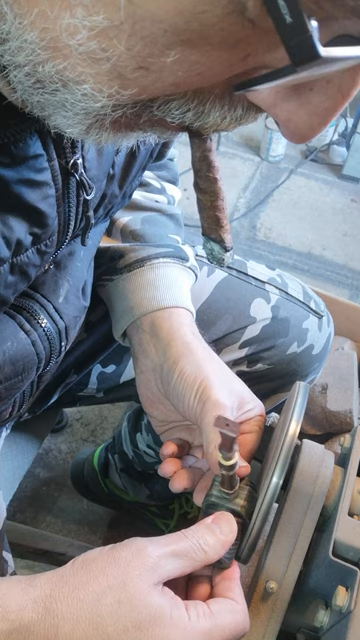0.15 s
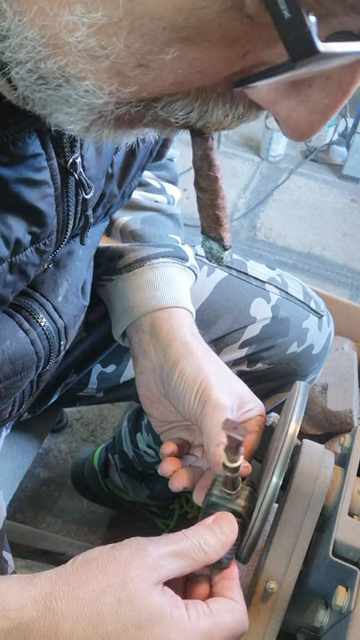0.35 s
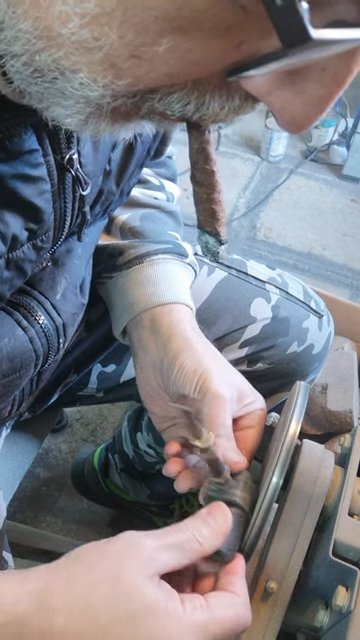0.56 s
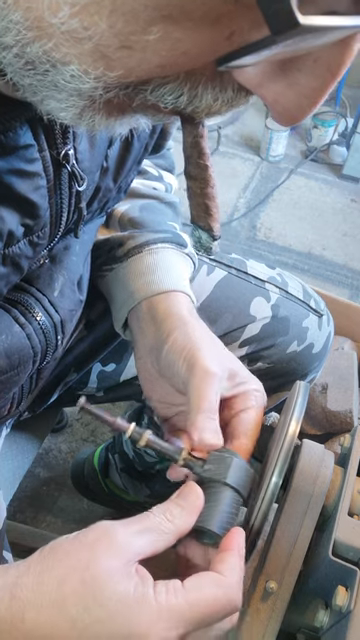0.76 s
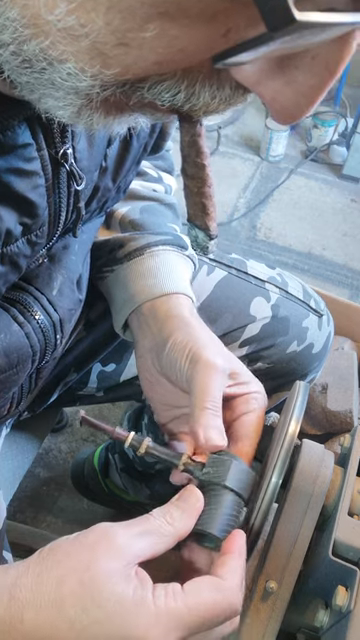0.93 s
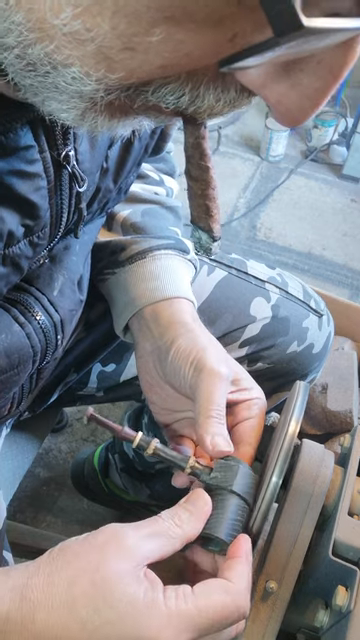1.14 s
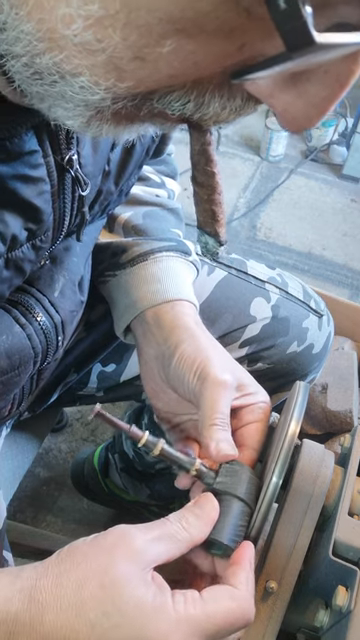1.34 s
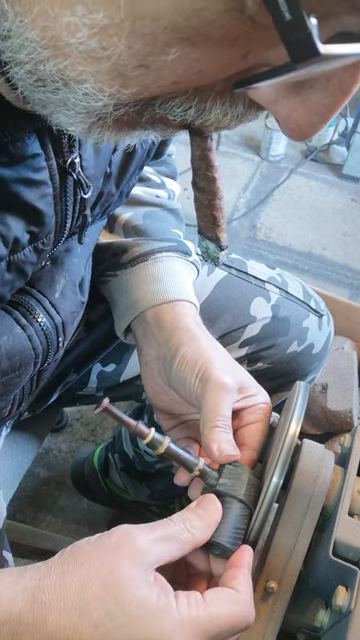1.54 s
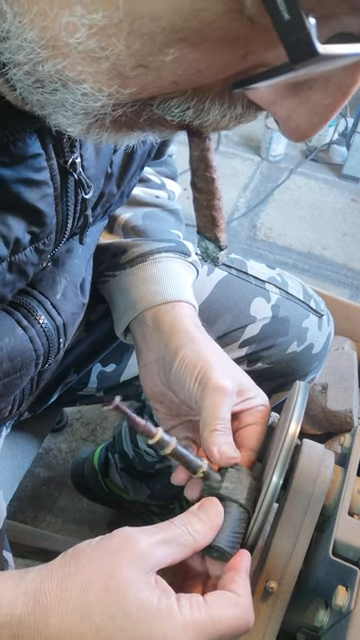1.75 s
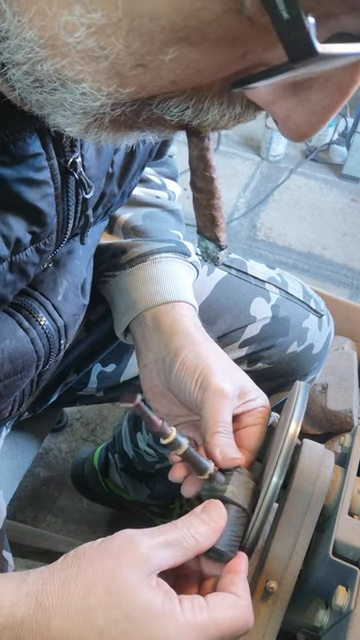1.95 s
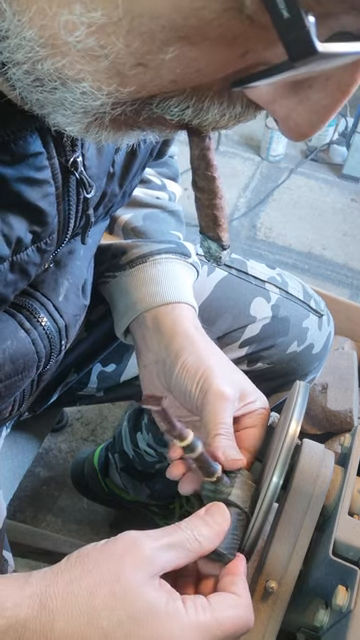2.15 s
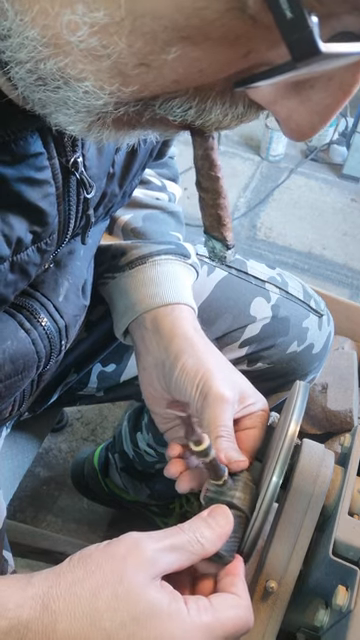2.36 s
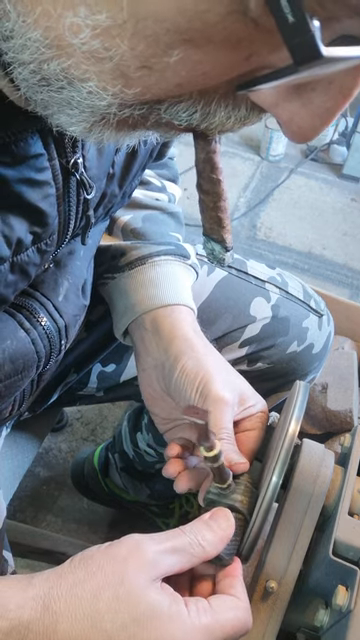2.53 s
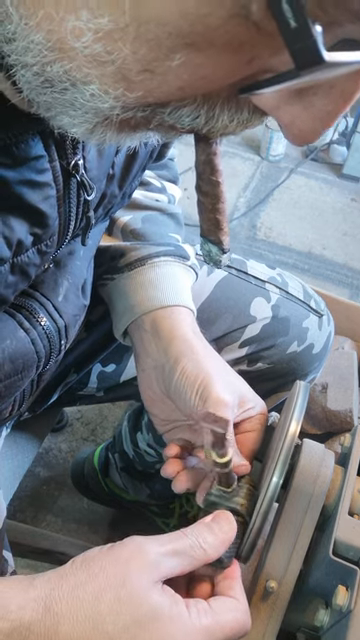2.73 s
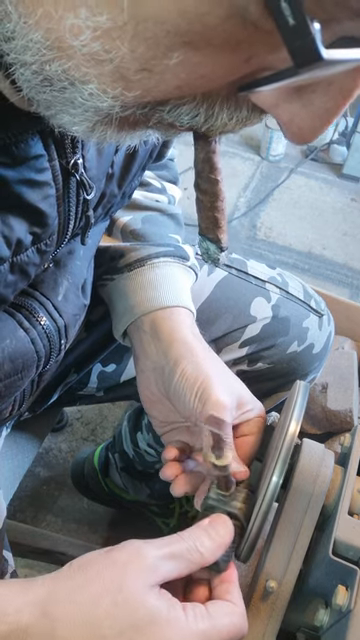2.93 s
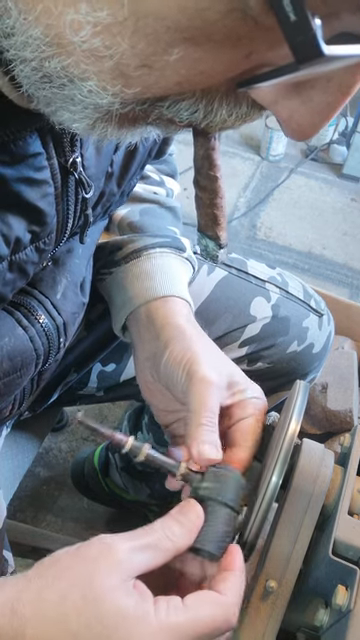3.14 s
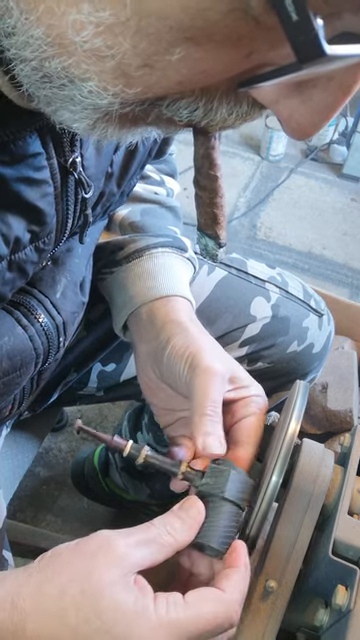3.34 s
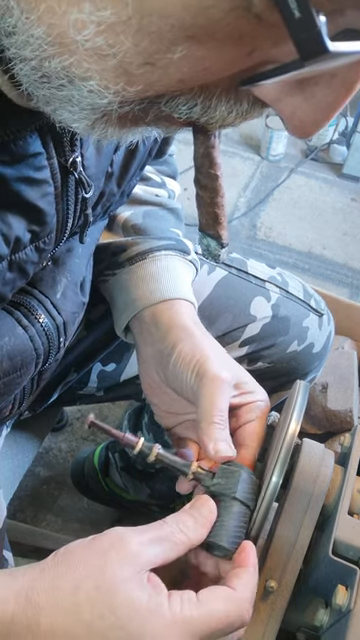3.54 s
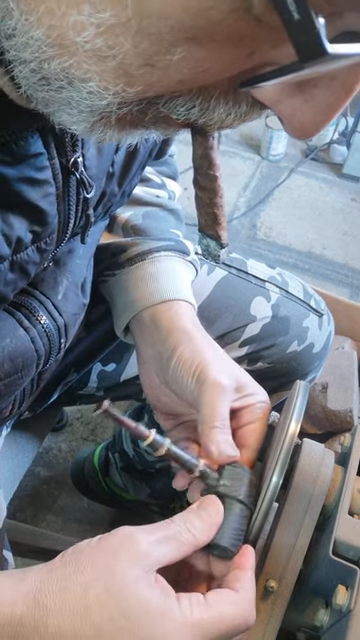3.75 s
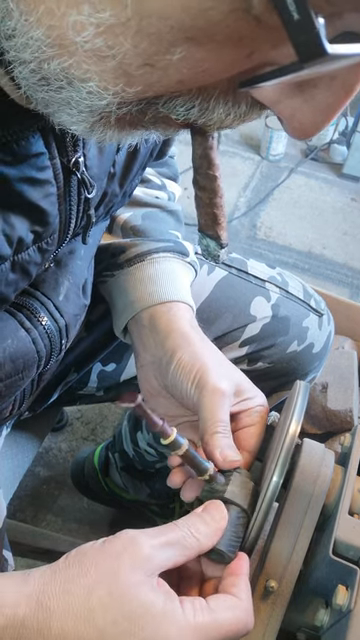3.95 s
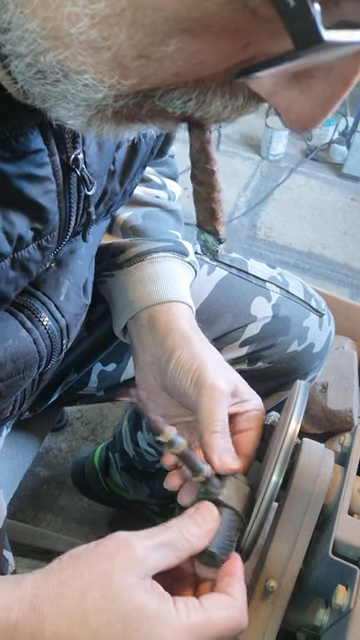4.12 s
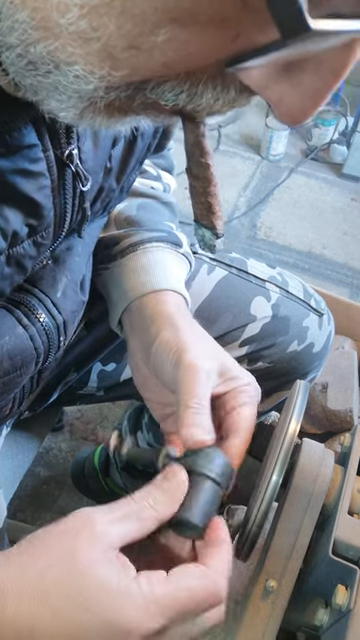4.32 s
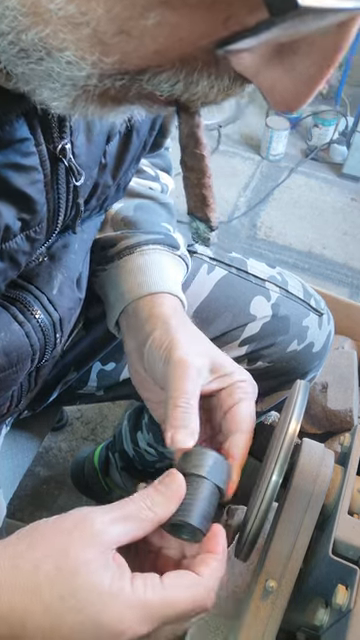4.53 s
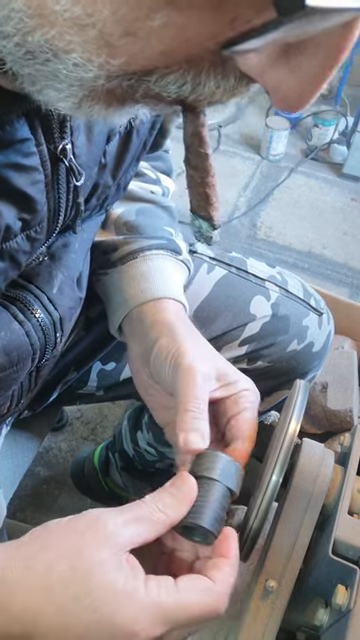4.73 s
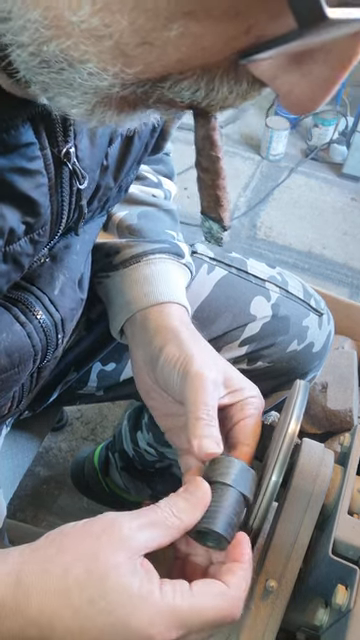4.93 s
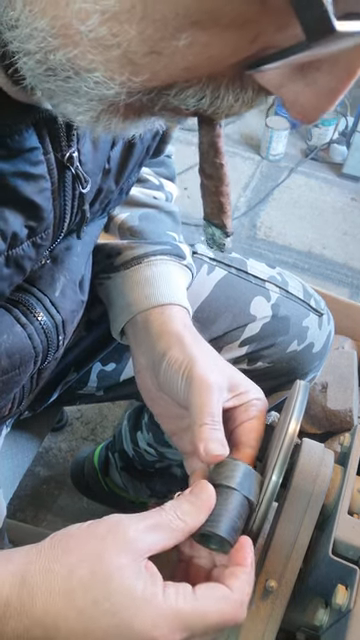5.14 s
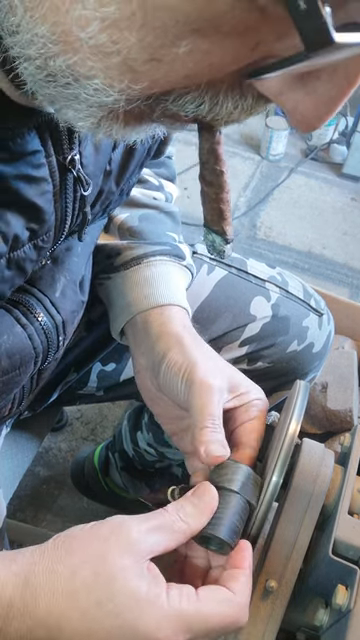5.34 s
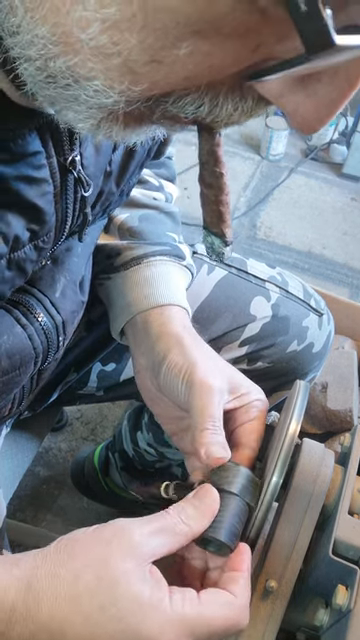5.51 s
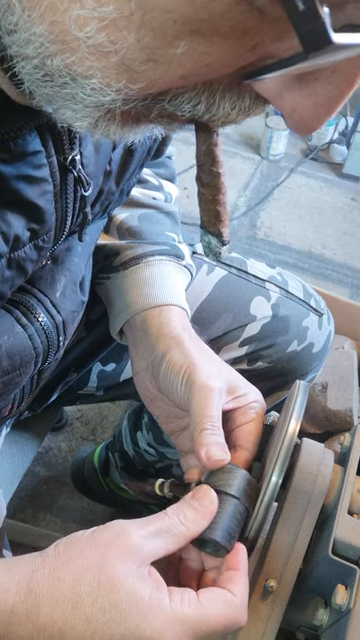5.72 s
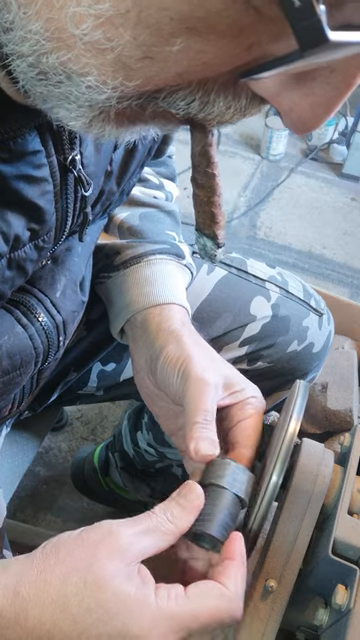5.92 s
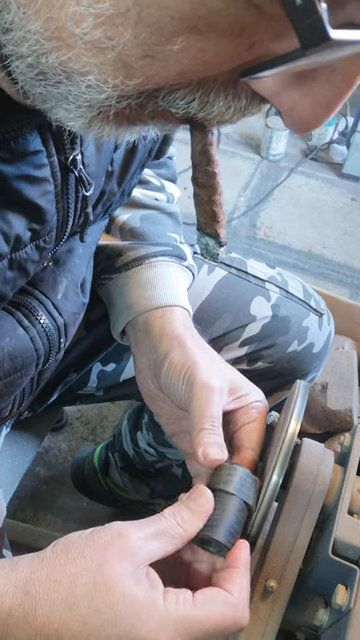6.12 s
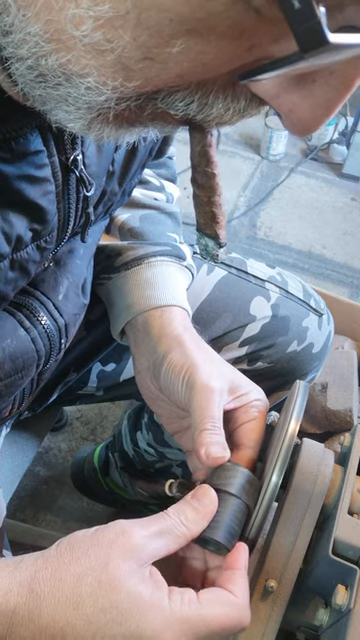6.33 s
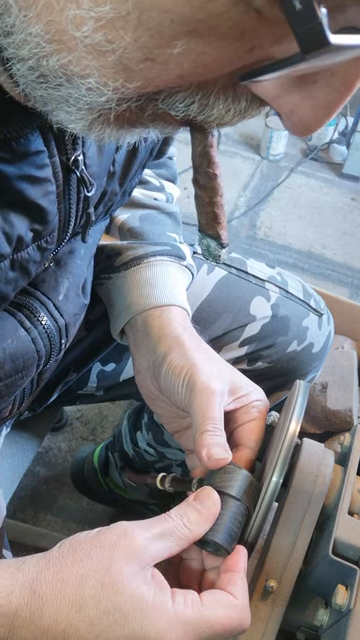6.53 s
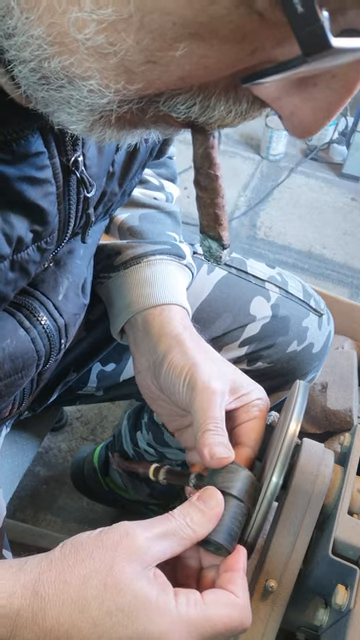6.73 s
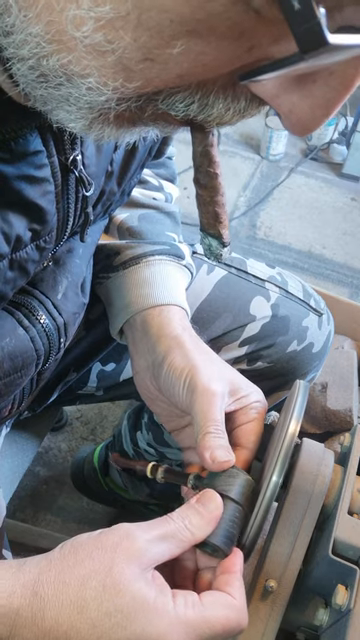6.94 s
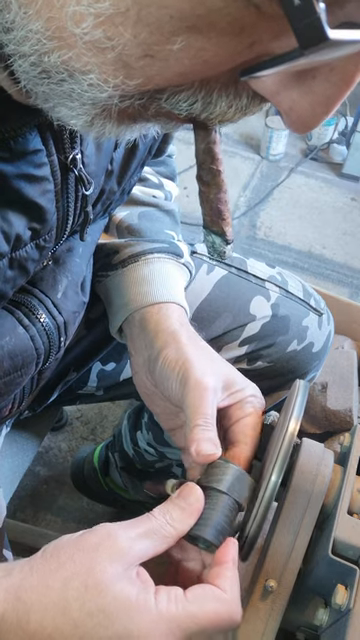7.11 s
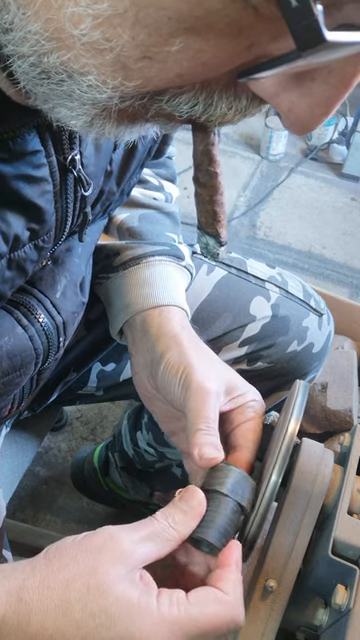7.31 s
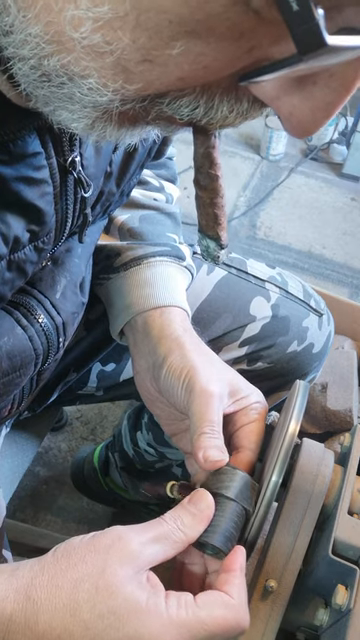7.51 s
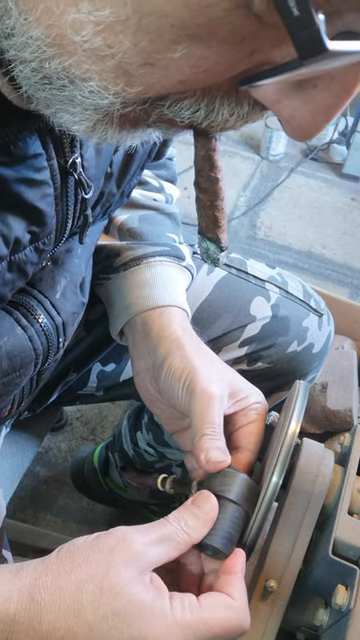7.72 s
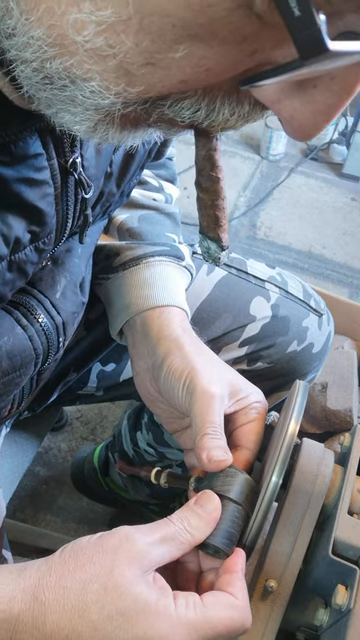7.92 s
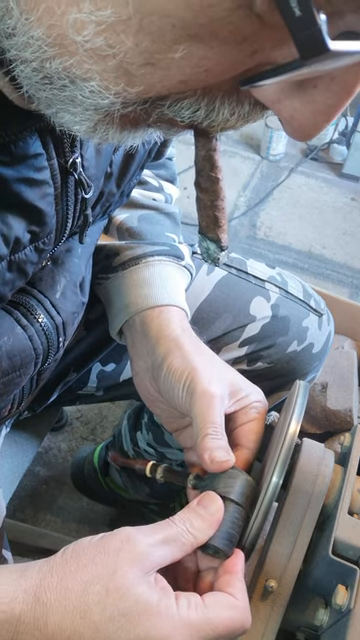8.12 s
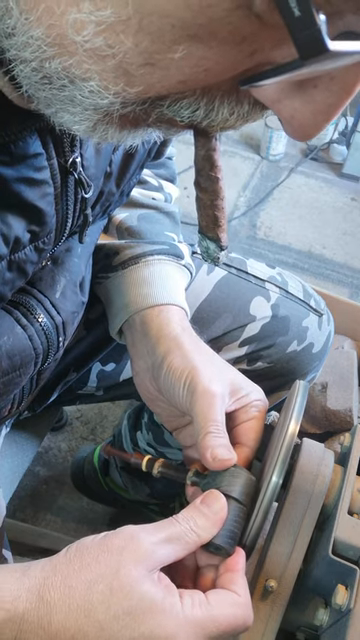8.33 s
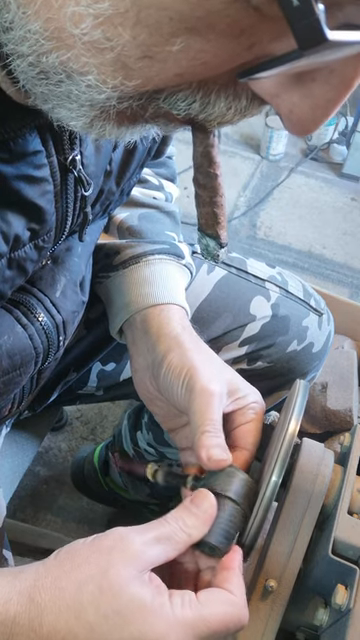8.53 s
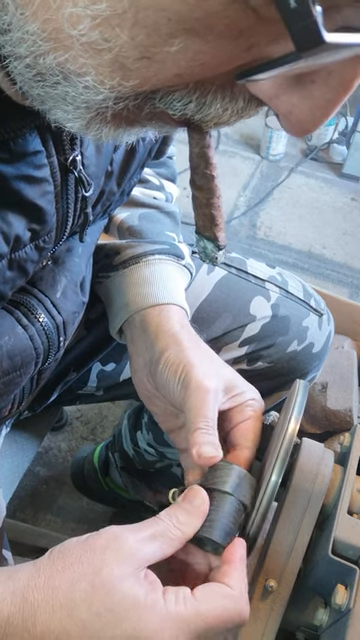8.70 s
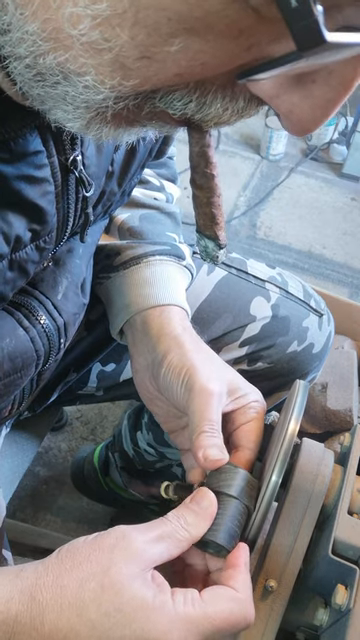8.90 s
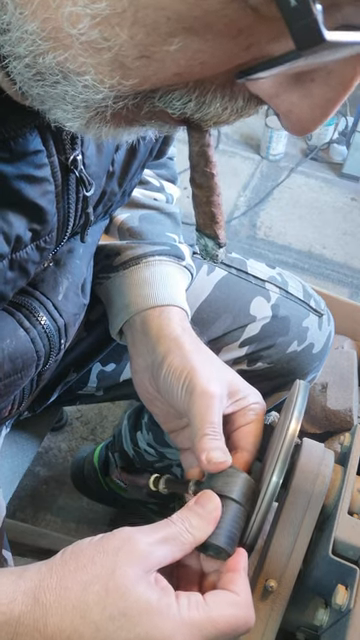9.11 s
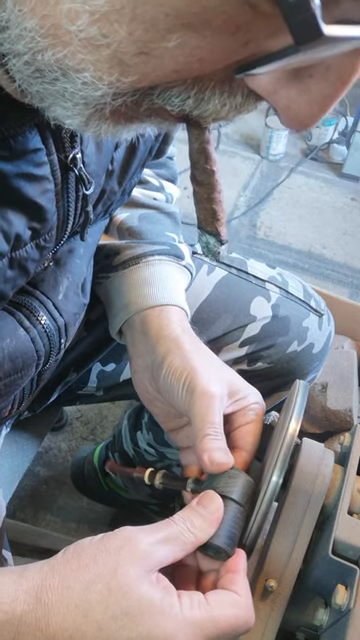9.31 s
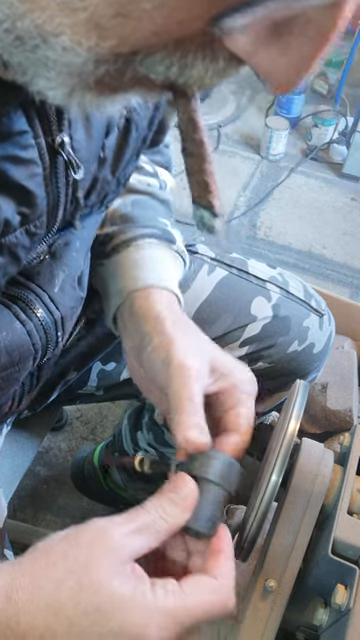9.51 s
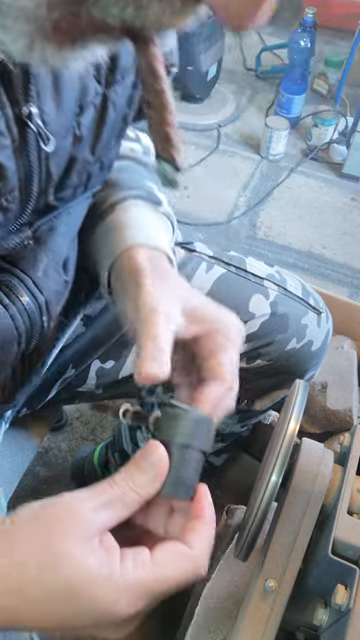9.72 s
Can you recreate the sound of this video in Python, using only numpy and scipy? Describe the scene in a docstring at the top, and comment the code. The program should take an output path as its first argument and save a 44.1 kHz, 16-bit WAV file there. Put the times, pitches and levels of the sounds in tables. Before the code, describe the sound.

An electric disc sander runs throughout, heard close up in stereo in a workshop with slight room reflections. Its motor gives a low hum, with a wavering fan whir and a soft hiss of air from the disc. A small piece of wood touches the disc seven times, each time making a bright, gritty rasp that throbs rapidly with the rotation. The first rasp is already under way and stops at about 0.7 seconds. The longest runs from 1.3 to 3.1 seconds, and a short one with a sharper start follows from 3.7 to 4.2. After a second of free running, four more come closer together: 5.2 to 5.9, 6.2 to 7.1, 7.5 to 8.6 and 8.9 to 9.5 seconds. Each touch slightly lowers the motor's pitch and softens its hum, which recovers as the wood lifts. The sander runs free briefly at the end.

```python
"""In a workshop, a disc sander runs on a bench and a small piece of wood touches it seven times.
Grit scrapes the wood with a bright rasp that throbs with each turn, and each touch slows the motor.
Underneath, the shaft and the mains hum, the fan whirs and air dragged by the disc hisses.
The sound is heard at two close microphone openings (ports), left and right."""
import sys
import numpy as np
from scipy import signal
from scipy.fft import rfft, irfft, next_fast_len
from scipy.io import wavfile

SR = 44100
rng = np.random.default_rng(int(sys.argv[2]) if len(sys.argv) > 2 else 0)


def bounce(signal):
    """Save signal as a 16-bit WAV file at the path given by the first command-line argument."""
    frames = np.transpose(np.atleast_2d(signal))
    limited = np.clip(frames, -1, 1)
    pcm = np.round(limited * 32767).astype(np.int16)
    wavfile.write(sys.argv[1], SR, pcm)


N = 430416
FFT_SIZE = next_fast_len(N)

# The wood's touches on the disc. Each row: landing time, time held and lifting time in seconds;
# rasp in dB at landing, once settled and at lift-off; first treble, last treble and wood body in dB
# against the rasp; hum in dB under load and once free; the free hum's change in dB per second.
TOUCHES = [(-.3, 1.045, 0.031, -33, -19.5, -20, -6.5, -6, -2, -37.5, -35, 8),
           (1.335, 1.73, 0.046, -23.5, -23, -19.5, -9, -4.5, -2.5, -40, -34, 2),
           (3.654, 0.53, 0.067, -18, -27, -19.5, -8.5, -9, -3, -39.5, -31, -6.5),
           (5.191, .66, 0.047, -28.5, -23, -18.5, -3, -4.5, -6, -42, -32, 1.5),
           (6.17, .925, 0.061, -29.5, -18, -18.5, -2.5, -7, -6.5, -40, -31, -13),
           (7.485, 1.112, 0.077, -26.5, -20.5, -17, -2.5, -7, -5.5, -42, -34, -5),
           (8.911, 0.56, .065, -22.5, -21.5, -18.5, -3, -5, -6.5, -41.5, -31.5, -13)]


def rasp(pressure, treble_gain, body_gain, turns):
    """Grains of grit tick the wood; the uneven disc repeats its pattern each turn and the hands tremble."""
    # The tone of the scrape. Each row: pitch in Hz, left and right strength in dB,
    # share common to both ports from 0 to 1, the right port's lead in radians.
    scrape_tone = [(2450, -30.5, -29.5, 0.95, -3), (3450, -20, -20.5, 0.08, -5),
                   (4260, -19.5, -15.5, 0.7, -4.5), (5580, -12.5, -18, 0, 1.5),
                   (6290, -12.5, -13.5, 0.31, -2.5), (7340, -6, -5, 0.5, -2), (7520, -2, -5, 1, -1.37),
                   (8060, -4.5, -11.5, 0.69, -0.9), (8840, -10, -4.5, 0, 1.3), (9740, -14, -2.5, 1, -2.5),
                   (10170, -16, -8, 0.1, 0.3), (11420, -22.5, -18.5, 0.26, 2),
                   (13000, -25.5, -22, 0.7, 0.5), (14900, -25, -20.5, 0.5, 2.5)]
    grain_sizes = gain_of(0.51 * np.minimum(rng.exponential(1, N), 4))
    grit = grain_sizes * rng.standard_normal(N) * (rng.random(N) < .6)
    wander = 0.75 * drift(1.8)
    lumps = sum(np.cos(2 * np.pi * (k * turns + rng.random() + wander)) / k ** 0.17 for k in range(1, 9))
    tremble = 0.57 * drift(40, low_hz=5)
    level = unit_level(gain_of(0.5 * lumps + tremble)) * pressure
    scrape = unit_level(grit) * level
    spectrum = ports(scrape_tone, scrape, workshop_echoes(scrape, level, echo_share=0.69))
    # Four bands, each with its own level. From low to high: body, core, sheen, treble.
    hz = np.fft.rfftfreq(FFT_SIZE, 1 / SR)
    low = 1 / (1 + (hz / 6400) ** 16)
    upper = 1 / (1 + (8300 / (hz + 1)) ** 30)
    top = 1 / (1 + (11000 / (hz + 1)) ** 20)
    bands = irfft(spectrum * np.array([low, 1 - low - upper, upper - top, top])[:, None], FFT_SIZE)[..., :N]
    body, core, sheen, treble = (unit_level(band) * np.sqrt(np.mean(pressure ** 2)) for band in bands)
    sheen_gain = gain_of(-2.7) * treble_gain ** 0.43  # partly follows the treble
    return body_gain * body + core + sheen_gain * sheen + treble_gain * treble


def touch(start_s, held_s, lift_s, first_db, settled_db, last_db, treble_from_db, treble_to_db, body_db):
    """Rasp, treble and body of one touch in dB: the grit bites, the hands settle, the wood lifts off."""
    bite_db, bite_s, settle_s = -6.5, 0.0069, .11
    t = np.arange(N) / SR - start_s
    age = np.maximum(t, 0)
    progress = np.clip(t / held_s, 0, 1)
    lifted = (np.maximum(t - held_s, 0) / lift_s) ** 1.336
    level = settled_db + (last_db - settled_db) * progress
    level += (first_db - settled_db) * np.exp(-age / settle_s)
    level += bite_db * np.exp(-age / bite_s) - 19 * lifted
    treble = treble_from_db + (treble_to_db - treble_from_db) * progress ** 1.3
    treble -= 7 * np.minimum(lifted, 1)  # the treble leaves first
    body_follows, firm_db = 0.63, -24  # the body takes this share of changes around a firm touch
    body = body_db - (1 - body_follows) * (np.maximum(level, -45) - firm_db)
    return np.where((t >= 0) & (lifted < 2), [level, treble, body], -200)


def contact():
    """All touches together: pressure, treble gain, body gain and the drag on the disc from 0 to 1."""
    levels_db = np.array([touch(*row[:9]) for row in TOUCHES]).max(0)
    treble_gain, body_gain = gain_of(np.maximum(levels_db[1:], -40))
    drag = np.clip((levels_db[0] + 36) / 14, 0, 1)
    return gain_of(levels_db[0]), treble_gain, body_gain, drag


def motor_hum(drag, load, turns):
    """The shaft shakes the bench at multiples of its speed; the load changes which tones stand out."""
    # The shaft's tones. Each row: multiple of the shaft speed, relative dB running free and under load.
    shaft_tones = [(2, -22, -12.5), (3, -7.5, -11), (4, -9, 0.5), (5, -8.5, -33), (6, -34, -27),
                   (7, -13.5, -12), (8, -20, -8), (10, -17, -58), (11, -28.5, -13.5)]
    mains_hz, stand_hz = 100, 43.5
    t = np.arange(N) / SR
    groan_hz = 75.7 + 11.5 * np.clip(load - drag, 0, 1)
    tones = [(k * turns, free_db, loaded_db) for k, free_db, loaded_db in shaft_tones]
    tones += [(mains_hz * t, -13.5, -5),  # magnetic pull, twice per mains cycle
              (np.cumsum(groan_hz) / SR, -1, -10),  # the bench groans: up at lift-off, then sliding down
              (stand_hz * t, -13, -6)]  # the stand hums low
    strain = np.minimum(drag, load)  # the bench answers a lift-off at once, a touch slowly
    hum = np.zeros(N)
    for cycles, free_db, loaded_db in tones:
        wavering_db = free_db + (loaded_db - free_db) * strain + 1.7 * drift(5.4)
        hum += gain_of(wavering_db) * np.sin(2 * np.pi * (cycles + rng.random()))
    return gain_of(hum_level(drag)) * hum * np.ones((2, 1))


def hum_level(drag):
    """The hum in dB: it sinks under each touch, returns when the disc runs free, then swells or fades."""
    opening_db, dip_db, regrow_s, hang_on_s = -34, -5.5, 0.21, 0.058
    start_s, held_s, *_, under_db, after_db, db_per_s = np.transpose(TOUCHES)
    t = np.arange(N) / SR
    latest = np.searchsorted(start_s + held_s / 2, t) - 1  # the last touch that is half over
    free_s = np.clip(t - start_s[latest] - held_s[latest], 0, 1)
    free_db = np.where(latest < 0, opening_db, after_db[latest] + db_per_s[latest] * free_s)
    landed = np.searchsorted(start_s, t) - 1
    loaded_db = under_db[landed] + dip_db * np.exp((start_s[landed] - t) / regrow_s)
    loaded_share = np.minimum(drag, np.clip(lag(drag, hang_on_s) * 2.9 - .9, 0, 1))
    return free_db + (loaded_db - free_db) * loaded_share


def fan_whir(turns):
    """The fan stirs the air into a whir that slowly rises and falls in level."""
    # The tone of the whir. Each row: pitch in Hz, left and right strength in dB,
    # share common to both ports from 0 to 1, the right port's lead in radians.
    whir_tone = [(30, -9, -10, 0.97, 2), (60, -5, -9, 0.76, 0.2), (133, -14, -12.5, 1, 1.07),
                 (330, -14.5, -15, 0.65, -0.87), (464, -19.5, -17, 0.15, 1), (571, -10, -11, 0.75, 3.0),
                 (643.3, -2, 5, 0.8, 3), (822, -6, 2, 0.64, 2.5), (972, -14, -5.5, 0.13, 1.27),
                 (1310, -15.5, -16.5, 0.041, -0.5), (1583, -9, -7.5, 0.076, 3), (2000, -10, -12.5, 0.2, 4),
                 (2730, -12.5, -7.5, 0.19, 4), (3430, -17, -22, 0.24, 3.5)]
    # The fan's loudness over time. Each row: time in seconds, level in dB.
    whir_levels = [(0, -31.5), (.7, -33.5), (1.15, -28), (1.45, -33.5), (2.1, -29), (3.4, -29), (3.85, -32),
                   (4.6, -28.5), (5.5, -32.5), (6, -29.5), (6.4, -33), (7.3, -31), (7.75, -32.5),
                   (8.2, -30), (8.43, -30), (8.65, -30), (9.15, -33), (9.65, -30.5)]
    level_db = np.interp(np.arange(N) / SR, *np.transpose(whir_levels))
    return rushing_air(whir_tone, turns, level_db, flutter_db=1.0, throb_db=1.04)


def disc_hiss(turns):
    """Air dragged along by the spinning disc hisses."""
    # The tone of the hiss. Each row: pitch in Hz, left and right strength in dB,
    # share common to both ports from 0 to 1, the right port's lead in radians.
    hiss_tone = [(3380, -12, -3.5, 0.43, 0), (4520, -5.5, -4, 0, 0), (7340, -3.5, -5.5, 0.27, 0),
                 (7430, 2, 1.5, 0.18, 0), (8040, -5.5, -9, 0, 0), (8960, -19, -4, 0.35, 0),
                 (10240, -24, -13.5, .1, 0), (15000, -28, -21.5, 0, 0)]
    return rushing_air(hiss_tone, turns, level_db=-38, flutter_db=1.3, throb_db=1.75)


def rushing_air(tone, turns, level_db, flutter_db, throb_db):
    """Swirling air makes noise that flutters and throbs once a turn."""
    level = gain_of(flutter_db * drift(60, low_hz=5) + throb_db * np.cos(2 * np.pi * turns))
    noise = level * rng.standard_normal(N)
    spectrum = ports(tone, noise, workshop_echoes(noise, level, echo_share=0.44))
    return gain_of(level_db) * unit_level(irfft(spectrum, FFT_SIZE)[:, :N])


def workshop_echoes(sound, level, echo_share, fade_s=0.14, shift_s=1.312):
    """Bench and walls echo, changing as the hands shift; moving surfaces scatter the rest into noise."""
    t = np.arange(SR // 8) / SR
    shape = (3, 2, len(t))  # three sets of echoes at two ports
    taps = rng.choice([-1., 1.], shape) * (rng.random(shape) < .1) * gain_of(-60 * t / fade_s)
    taps /= np.linalg.norm(taps, axis=2, keepdims=True)
    blend = np.cos(np.pi * (np.arange(N) / SR / shift_s + np.arange(3)[:, None]) / 3) * np.sqrt(2 / 3)
    echoes = sum(signal.oaconvolve((sound * weight)[None], echo, axes=1)[:, :N]
                 for weight, echo in zip(blend, taps))
    scattered = level * rng.standard_normal((2, N))
    return np.sqrt(echo_share) * echoes + np.sqrt(1 - echo_share) * scattered


def ports(tone, direct, echoes):
    """The spectrum at each port: a shared wave plus its own echoes, coloured by the ringing machine."""
    # Motor casing, steel disc and guard ring. Each row: pitch in Hz, width in Hz, boost or cut in dB.
    machine_rings = [(612.6, 12.5, 4), (660, 9.4, 0.5), (730, 8.2, -4), (801, 4.4, 4.5), (850, 17, 3),
                     (2280, 83, 5), (2659, 29, 11), (3770, 33, -11), (5850, 50, 4), (7140, 86, -3.5),
                     (7640, 64, -1), (7856, 98, 6), (8970, 200, 1.5), (8850, 130, 1), (9450, 45, 3.5),
                     (9530, 140, 2.5), (14200, 200, 1)]
    hz = np.fft.rfftfreq(FFT_SIZE, 1 / SR) + 1
    row_hz, *columns = np.transpose(tone)
    left_db, right_db, share, lead = (np.interp(np.log(hz), np.log(row_hz), c) for c in columns)
    share = np.clip(share, 0, 1)
    octaves_outside = np.maximum(np.log2(row_hz[0] / hz), 0) + np.maximum(np.log2(hz / row_hz[-1]), 0)
    rings_db = sum(resonance(hz, *ring) for ring in machine_rings)
    left_db += resonance(hz, mid_hz=7610, width_hz=370, boost_db=4.3)  # the left port's hollow sings
    colour = gain_of(np.array([left_db, right_db]) + rings_db - 14 * octaves_outside)
    common = rfft(direct, FFT_SIZE) * np.array([np.ones(len(hz)), np.exp(1j * lead)])
    return colour * (np.sqrt(share) * common + np.sqrt(1 - share) * rfft(echoes, FFT_SIZE))


def resonance(hz, mid_hz, width_hz, boost_db):
    """A peak or dip in dB around one pitch."""
    return boost_db / (1 + (2 * (hz - mid_hz) / width_hz) ** 2)


def drift(top_hz, low_hz=.3):
    """A random wobble made of sine waves from low_hz to top_hz, the slow ones strongest."""
    t = np.arange(0, N + 64, 64) / SR
    hz = np.geomspace(low_hz, top_hz, num=30)[:, None]
    wobble = (np.sin(2 * np.pi * (hz * t + rng.random(hz.shape))) / hz ** 0.24).sum(0)
    return np.interp(np.arange(N) / SR, t, unit_level(wobble))


def lag(x, seconds):
    """Follow x smoothly and a little late, starting at its first value."""
    pole = np.exp(-1 / (seconds * SR))
    return signal.lfilter([1 - pole], [1, -pole], x, zi=[pole * x[0]])[0]


def gain_of(db):
    """Turn decibels into a multiplier."""
    return 10 ** (np.asarray(db) / 20)


def unit_level(x):
    """Scale a signal to an average power of one."""
    return x / np.sqrt(np.mean(x ** 2) + 1e-20)


def scene():
    """The wood drags on the disc and slows it; rasp, hum, whir and hiss follow the same turning shaft."""
    free_hz, loaded_hz = 24.78, 23.03  # shaft turns per second
    pressure, treble_gain, body_gain, drag = contact()
    load = lag(drag, seconds=0.0888)  # the heavy disc takes a moment to slow down
    slowed = lag(np.minimum(drag, load), seconds=0.023)  # the motor regains its speed quickly
    turns = np.cumsum(free_hz + (loaded_hz - free_hz) * slowed) / SR
    air = fan_whir(turns) + disc_hiss(turns)
    return rasp(pressure, treble_gain, body_gain, turns) + motor_hum(drag, load, turns) + air


def record(dry):
    """Cut the deepest rumble, round off the tallest peaks and remove the very highest treble."""
    rumble_hz, ceiling, top_hz = 36, .95, 15270
    cut = signal.sosfilt(signal.butter(4, rumble_hz, "high", fs=SR, output="sos"), dry)
    rounded = cut / (1 + (abs(cut) / ceiling) ** 4) ** (1 / 4)
    low_pass = signal.firwin(511, top_hz, window=("kaiser", 9), fs=SR)
    return signal.oaconvolve(rounded, low_pass[None], "same")


dry = scene()
out = record(dry)
bounce(out)
```